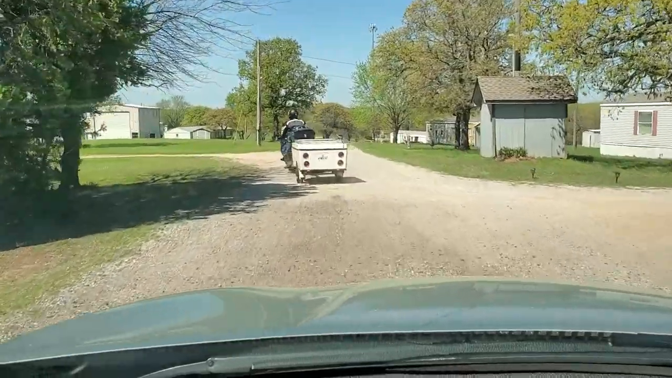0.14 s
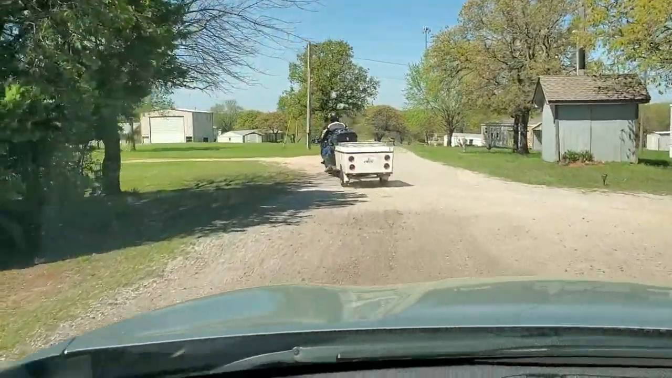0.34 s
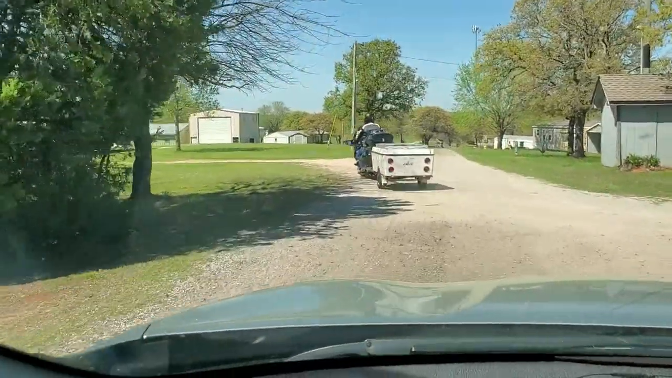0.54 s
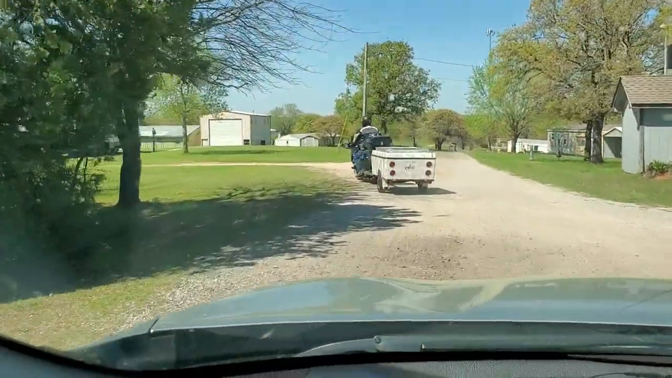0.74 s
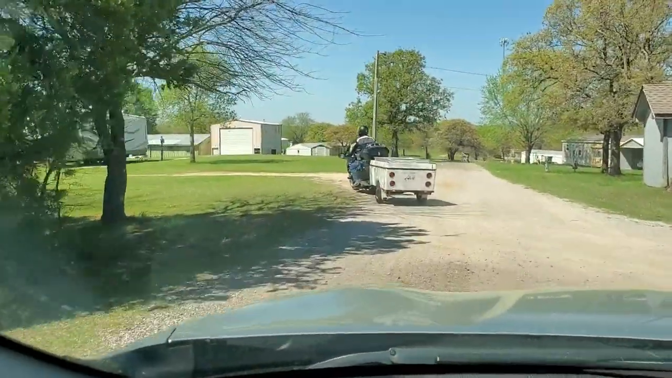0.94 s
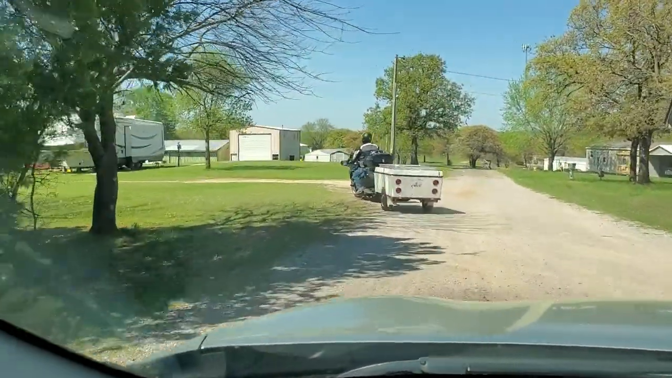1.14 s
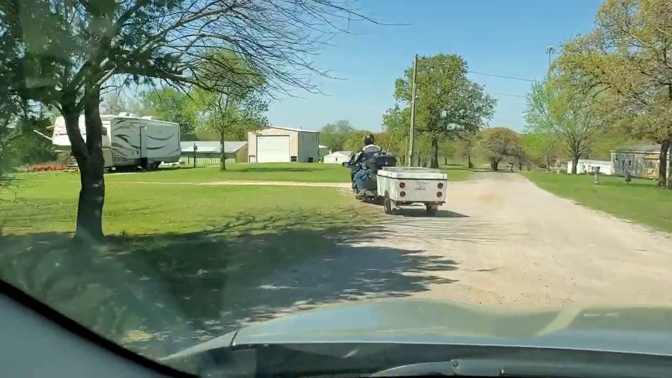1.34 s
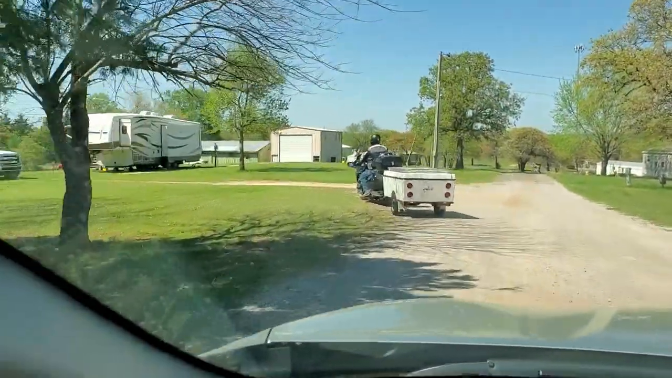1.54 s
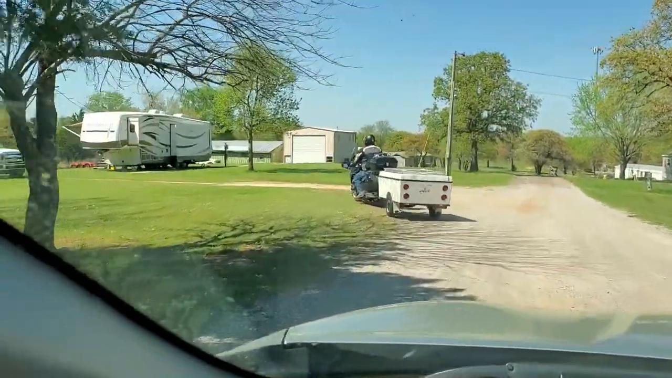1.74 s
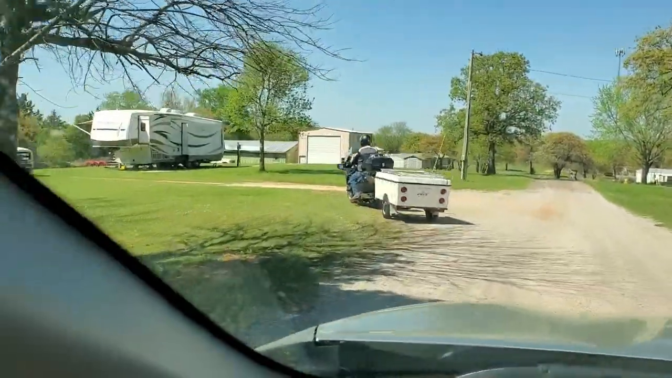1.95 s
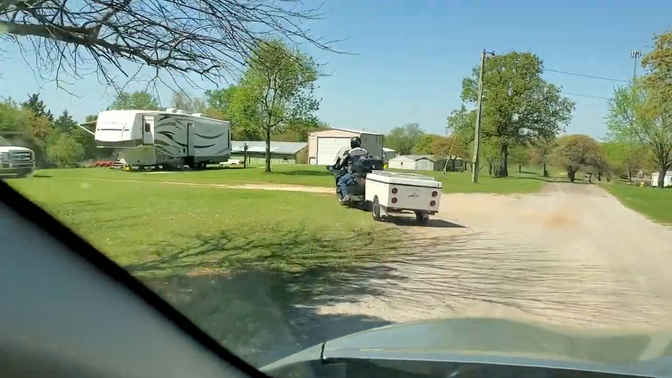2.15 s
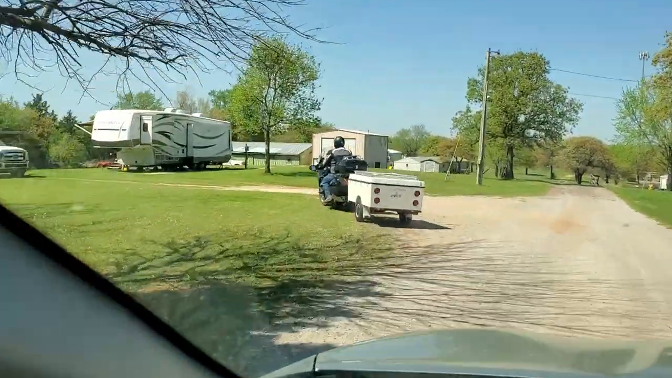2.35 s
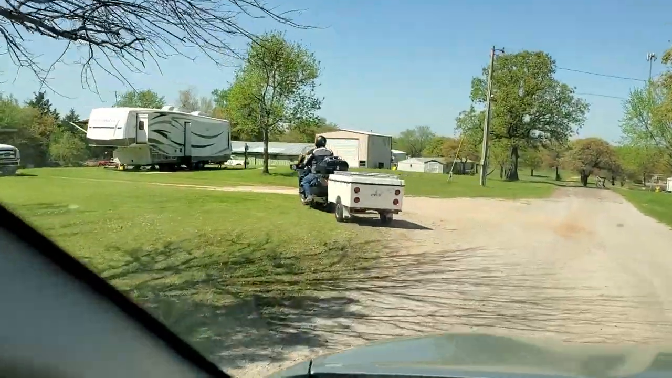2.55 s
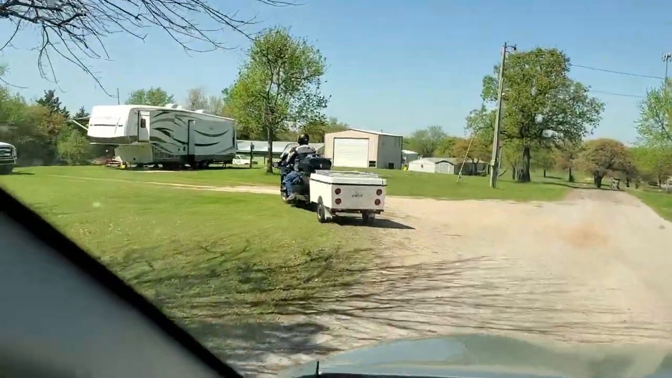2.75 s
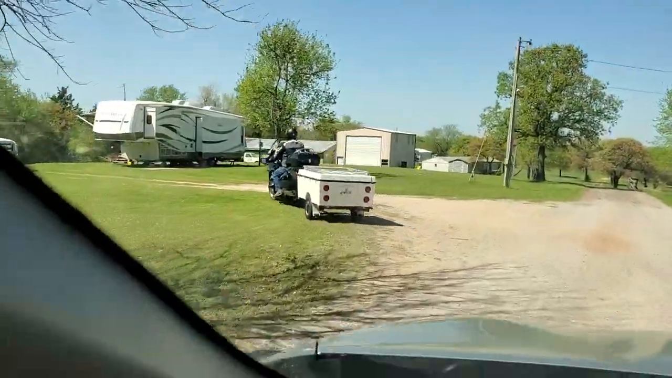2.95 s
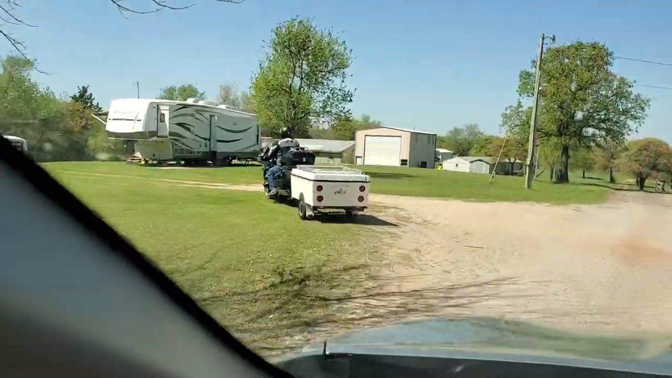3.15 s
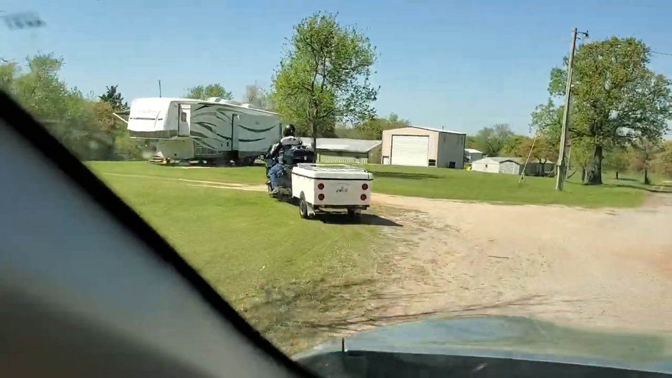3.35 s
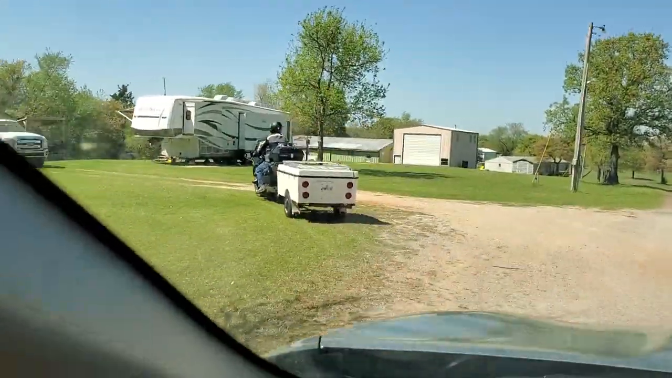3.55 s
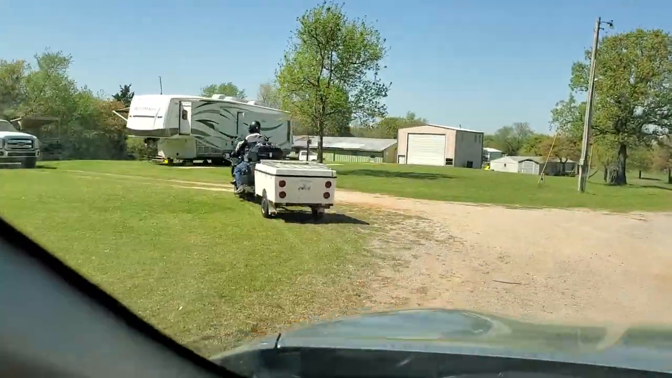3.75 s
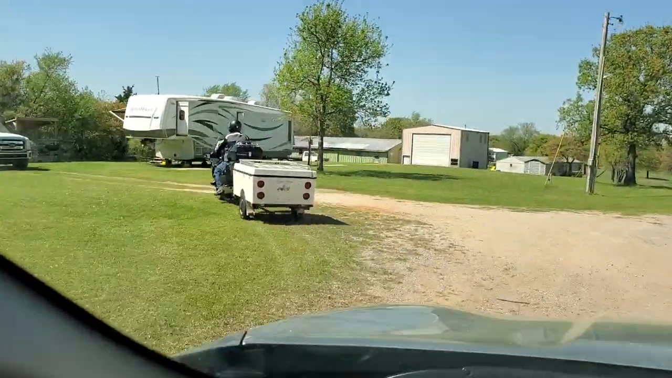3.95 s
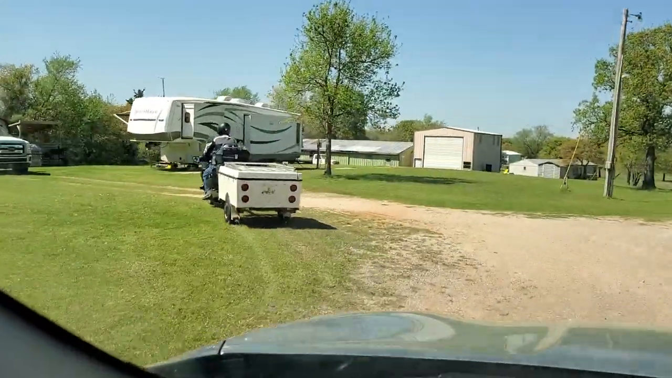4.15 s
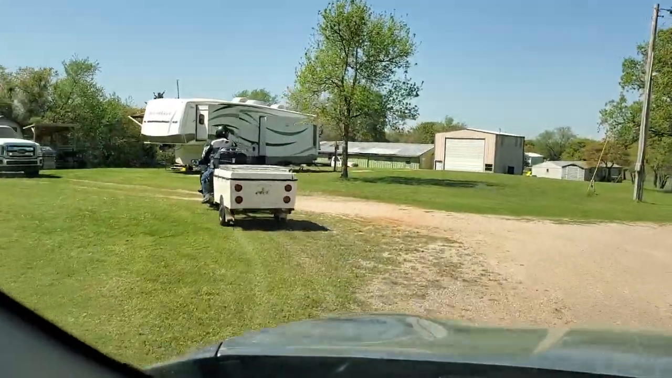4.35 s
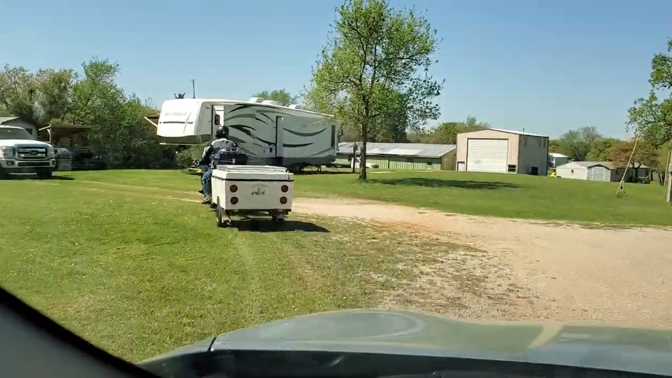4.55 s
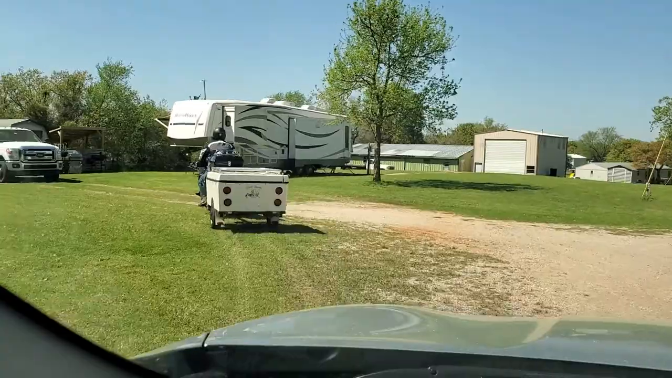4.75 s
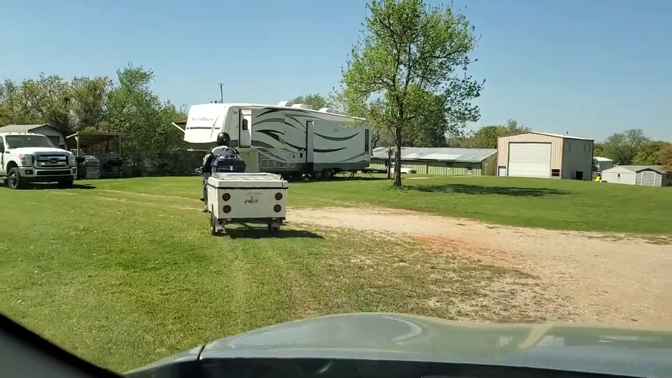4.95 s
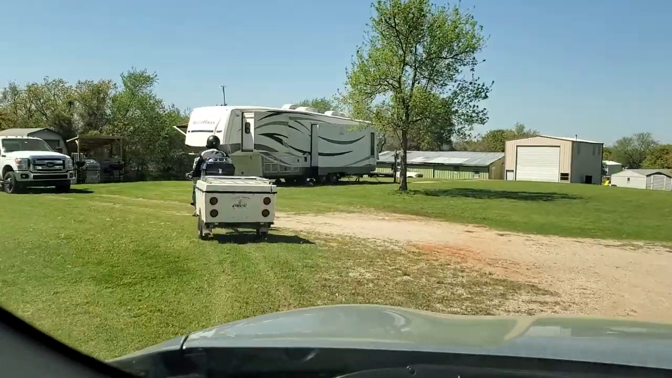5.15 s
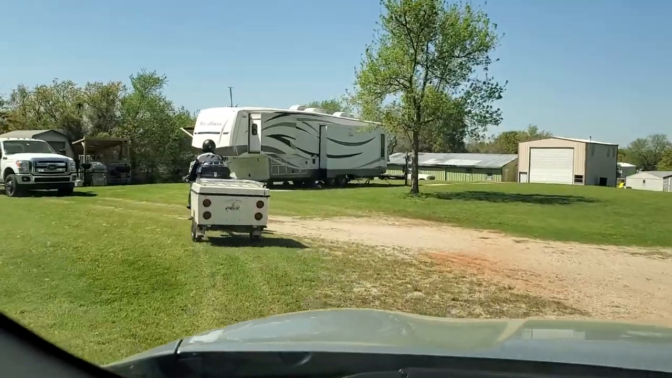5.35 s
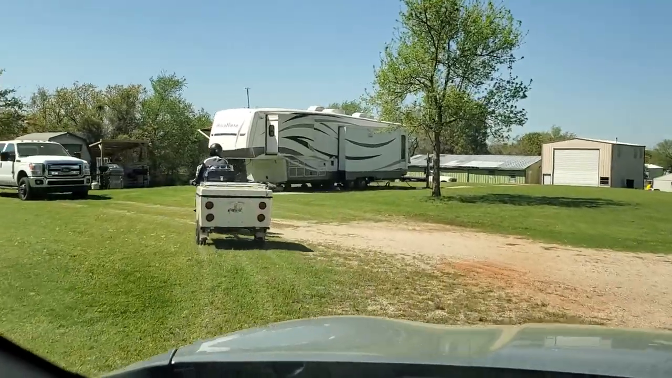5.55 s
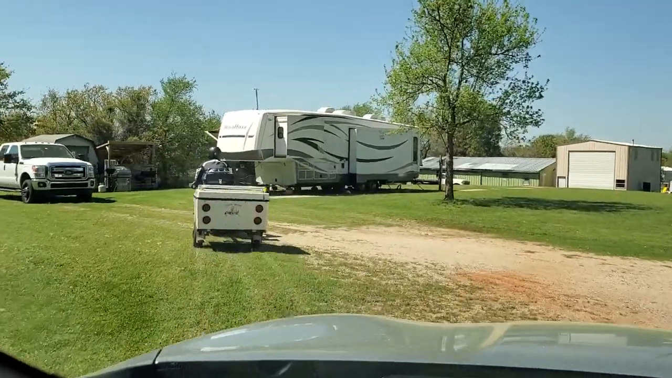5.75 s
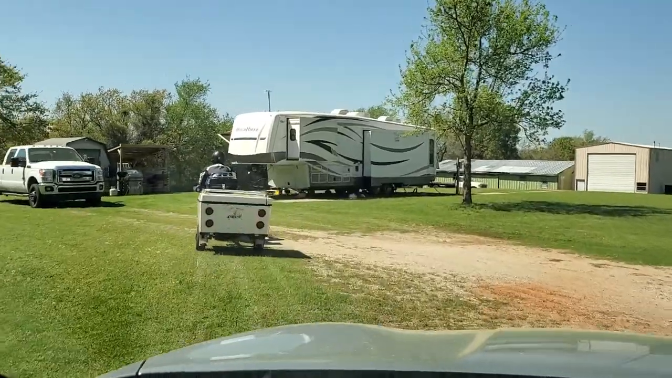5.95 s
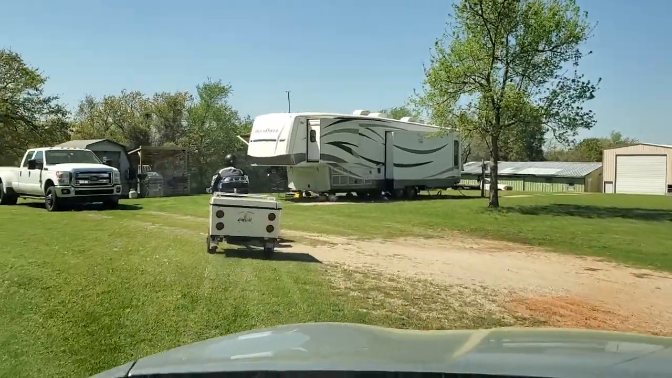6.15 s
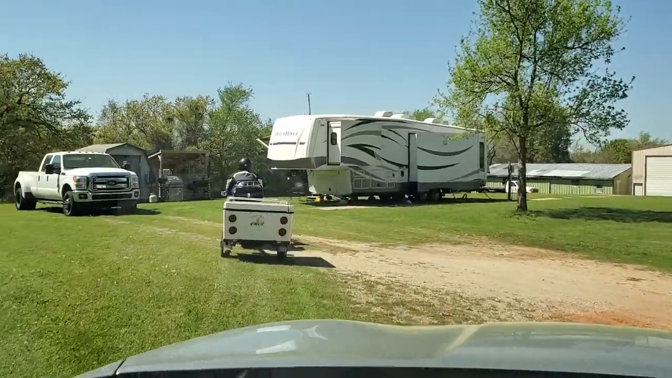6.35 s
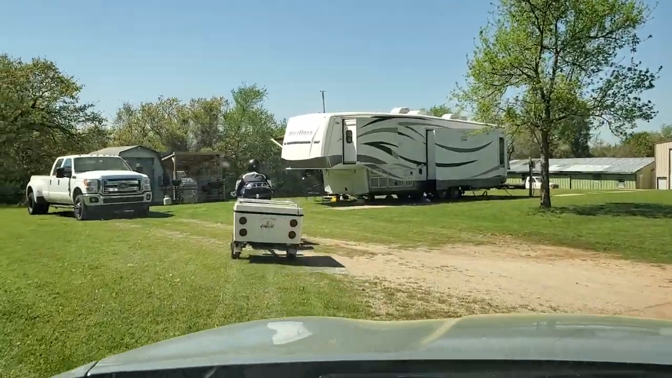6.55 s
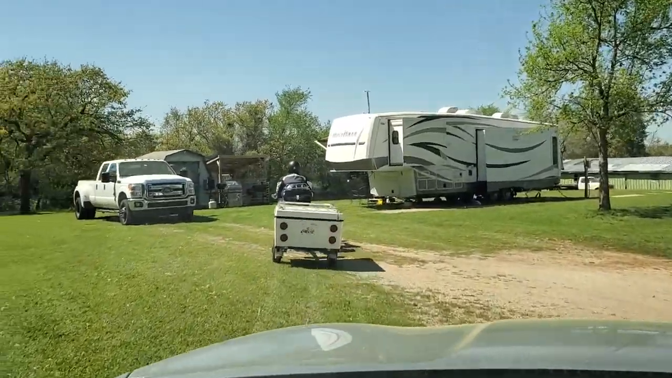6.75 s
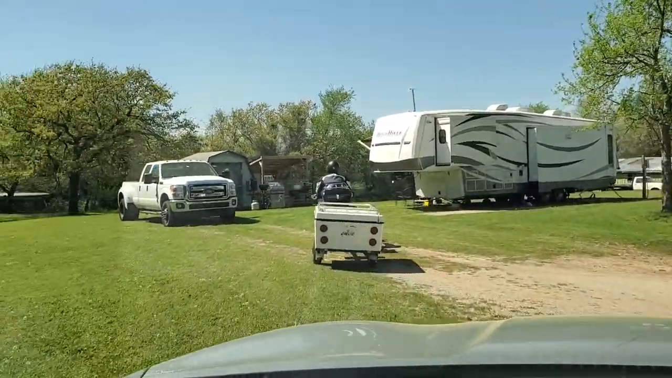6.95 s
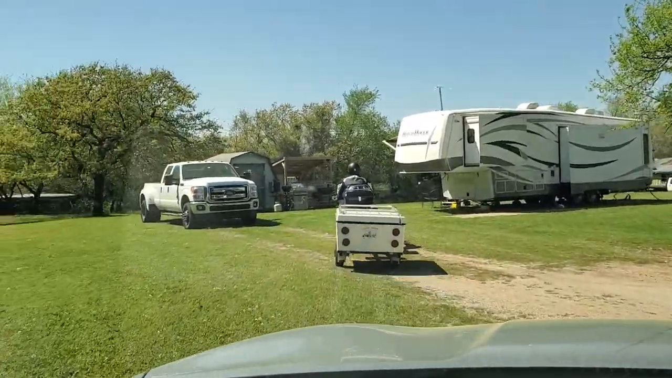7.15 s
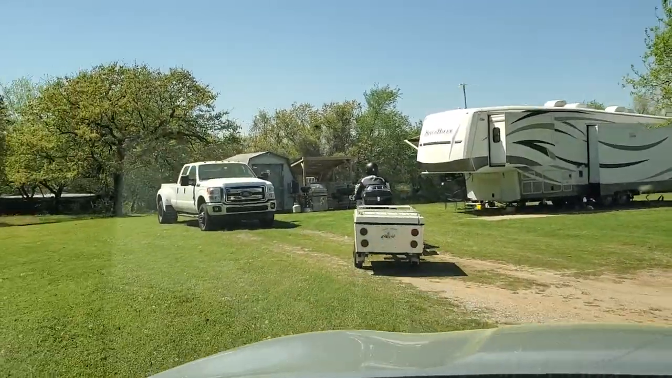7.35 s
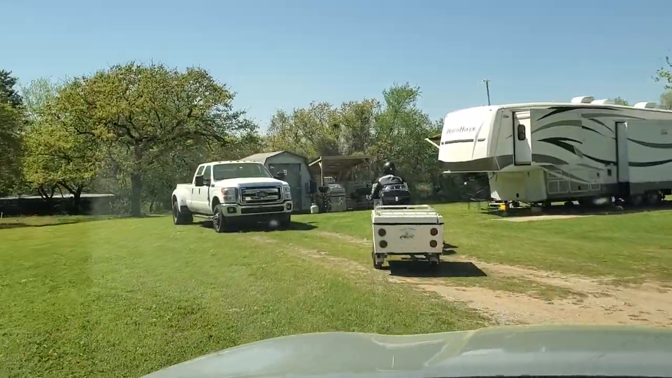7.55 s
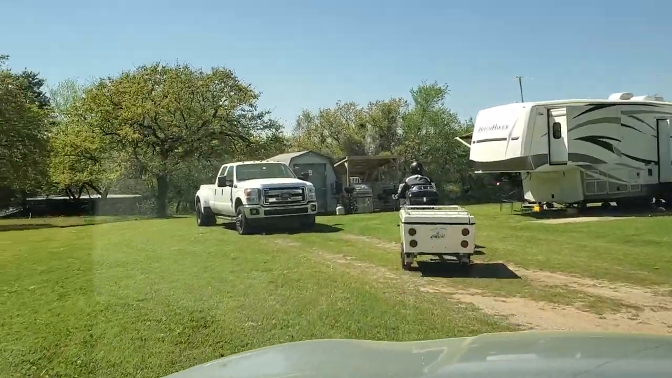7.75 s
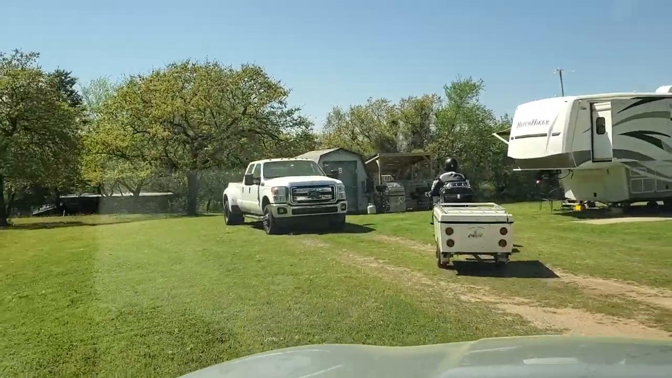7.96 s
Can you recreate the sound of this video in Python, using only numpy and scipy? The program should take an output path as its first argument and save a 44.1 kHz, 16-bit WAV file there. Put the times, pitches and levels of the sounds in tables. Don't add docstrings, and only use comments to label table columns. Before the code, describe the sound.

Heard from a hand-held phone inside a slowly moving car: deep, irregular rumble and soft booming bumps from rough gravel, with a low engine hum and airy vent hiss. A tiny stone tick comes early. The rumble eases on grass, the hand knocks the phone just before six seconds, then the vents blow stronger and the engine rises slightly. The left side is duller and quieter.

```python
import sys
import numpy as np
from scipy import signal
from scipy.fft import rfft, irfft, next_fast_len
from scipy.io import wavfile
from scipy.ndimage import uniform_filter1d, map_coordinates

SR = 44100
rng = np.random.default_rng(int(sys.argv[2]) if len(sys.argv) > 2 else 0)


def volts_from_db(level):
    exponent = np.asarray(level, float) / 20
    return 10 ** exponent


def to_wav(sig):
    pcm = np.clip(np.atleast_2d(sig), -1, 1) * 32767
    pcm = np.round(pcm).astype(np.int16)
    wavfile.write(sys.argv[1], SR, pcm.T)


N = 356769


def unit(x):
    return x / np.sqrt(np.mean(x ** 2) + 1e-20)


def along(points, hz):
    f, v = np.transpose(points)
    return np.interp(np.log(hz + 1), np.log(f + 1), v)


def curves(rows):
    s, *cols = np.transpose(rows)
    return [np.interp(np.arange(N) / SR, s, c) for c in cols]


def wobble(rate):
    knots = rng.standard_normal(int(N * rate / SR) + 4)
    return map_coordinates(knots, [np.arange(N) * rate / SR])


def filtered(x, response):
    edge = SR // 8
    m = next_fast_len(N + 2 * edge)
    x = np.pad(x, [(0, 0)] * (x.ndim - 1) + [(edge, m - N - edge)], mode="reflect")
    return irfft(rfft(x) * response(np.fft.rfftfreq(m, 1 / SR)), m)[..., edge:edge + N]


def resonance(f, hz, width):
    return (f * width) ** 2 / ((hz * hz - f * f) ** 2 + (f * width) ** 2)


def shaken(modes, steady, span):
    def ring(f):
        return sum(volts_from_db(db) * resonance(f, hz, width) for hz, width, db in modes)

    x = filtered(rng.standard_normal((2, N)), ring)
    swell = np.abs(uniform_filter1d(x ** 2, round(span * SR), axis=1, mode="reflect"))
    return unit(x / (swell + 1e-12) ** (np.clip(steady, 0, 1) / 2))


def jolts(rows, half_s, db):
    t = np.arange(N) / SR
    phase = 2 * np.pi * rng.random(len(rows))
    out = np.zeros(N)
    for (s, peak_db, hz), start in zip(rows, phase):
        near = slice(max(round((s - .3) * SR), 0), round((s + .3) * SR))
        swell = np.exp(-.5 * ((t[near] - s) / half_s) ** 2)
        out[near] += volts_from_db(peak_db + db) * swell * np.sin(2 * np.pi * hz * t[near] + start)
    return out


# time in seconds, roughness in dB.
ROUGHNESS = [(0, 0.5), (.5, 1.5), (1.5, 0.5), (2.3, -1), (2.8, -1.5), (3.7, -3), (4.55, -1), (5.4, -5),
             (6.0, -6.5), (6.36, -11), (6.45, -4.5), (7.2, -9.5), (7.95, -6.5), (8.09, -1)]
# centre in Hz, width in Hz, level in dB.
CABIN_MODES = [(31.5, 7, -4), (43.7, 17, 4.5)]
# centre in Hz, width in Hz, level in dB.
PAN_MODES = [(63.2, 9.7, -7), (73.3, 12, -2.5), (78.8, 8, -6)]
# centre in Hz, width in Hz, level in dB.
AXLE_MODES = [(90.9, 9.1, -3.5), (98.3, 16, 3), (110.2, 8.8, -8), (124.6, 9.2, -10.5), (163, 15, -19)]
# peak time in seconds, peak level in dB, pitch in Hz.
HOLLOWS = [(0.5, -17.5, 47), (0.65, -19, 39), (1.26, -13, 44), (1.58, -13.5, 46), (1.98, -13, 44),
           (2.28, -16, 47), (2.39, -12.5, 42), (2.72, -17.5, 44), (3.39, -24, 47), (3.71, -20, 43),
           (3.92, -16.5, 40), (4.45, -24, 43), (4.6, -20.5, 44), (5.08, -20.5, 43), (6.93, -16.5, 41.1),
           (7.3, -17, 46), (7.53, -18, 46), (7.65, -17.5, 47), (7.9, -22, 46), (8.07, -18, 52)]
# peak time in seconds, peak level in dB, pitch in Hz.
RUTS = [(0.48, -16.5, 77), (0.51, -16, 103), (0.95, -15, 70), (1.15, -18, 67), (1.53, -17.5, 75.8),
        (1.67, -15.5, 94.3), (1.91, -16.5, 60.8), (1.99, -19.5, 94), (2.22, -21, 102.2),
        (2.34, -20.5, 98.3), (2.55, -19, 91.9), (3.02, -19.5, 67), (3.04, -16.5, 88.7), (3.46, -19, 89),
        (3.95, -20.5, 68.8), (4.12, -21.5, 96.1), (4.38, -22.5, 78), (4.5, -19, 90.1), (4.51, -20.5, 70),
        (4.63, -20, 70), (5.15, -20.5, 90.2), (5.29, -22, 70.5), (5.68, -17.5, 71.5), (5.9, -25, 75),
        (6.05, -22, 85.5), (6.17, -23.5, 93), (6.55, -23.5, 71.8), (6.68, -24, 77.95), (7.37, -24, 64),
        (7.7, -25.5, 68)]


def road():
    rough_db, = curves(ROUGHNESS)
    steady_db = -23.5
    boom = volts_from_db(steady_db + 0.42 * rough_db) * shaken(CABIN_MODES, steady=0.55, span=0.16)
    pan = volts_from_db(steady_db + 0.82 * rough_db) * shaken(PAN_MODES, steady=0.5, span=0.27)
    axle = volts_from_db(steady_db + 0.99 * rough_db) * shaken(AXLE_MODES, steady=0.4, span=0.041)
    single = jolts(HOLLOWS, half_s=0.075, db=0.0) + jolts(RUTS, half_s=0.046, db=0.5)
    return boom + pan + axle + single * [[1], [0]]


# time in seconds, firing rate in Hz.
FIRING = [(0, 41.4), (1.2, 42.7), (1.94, 42), (2.2, 45.6), (2.55, 42.5), (3.5, 45.4), (4.0, 40.96),
          (4.5, 43), (6.0, 38.6), (6.9, 40.15), (7.35, 45.02), (8.09, 49.5)]


def engine():
    hz, = curves(FIRING)
    idle_hz, idle_db, db_per_hz = 41, -34, .6
    turn = 2 * np.pi * np.cumsum(hz * (1 + .015 * wobble(3.2))) / SR
    level_db = idle_db + db_per_hz * (hz - idle_hz) + 2.4 * wobble(5)
    return volts_from_db(level_db) * (np.sin(turn) + volts_from_db(-9.5) * np.sin(2 * turn) + volts_from_db(-14.5) * np.sin(3 * turn))


# start in seconds, level in dB.
STONE_HITS = [
    (1.510, -55),
    (1.524, -56),
    (1.5355, -41.5),
    (1.551, -53),
]
# centre in Hz, width in Hz, level in dB, t60 in seconds.
STONE_BANDS = [(11500, 10000, 1, .03)]
# start in seconds, level in dB.
HAND_HITS = [
    (5.8375, -33),
    (5.845, -39),
    (5.862, -42),
]
# centre in Hz, width in Hz, level in dB, t60 in seconds.
FINGER_BANDS = [(2850, 400, -4, .06), (3500, 250, -4, .08), (6500, 2400, -15, .07), (900, 900, -1, .08)]
# pitch in Hz, level in dB, t60 in seconds.
SHELL_MODES = [(118, 2, .14), (160, 0, .12), (205, -3, .1), (300, -8, .08), (430, -7, .1), (520, -6, .1)]


def knocks():
    out = np.zeros((2, N + SR))
    t = np.arange(SR // 5) / SR
    f = np.fft.rfftfreq(len(t), 1 / SR)

    def burst(hz, width):
        noise = rng.standard_normal((2, len(t)))
        return unit(irfft(rfft(noise) * resonance(f, hz, width), len(t)))

    thud_db = 13
    thud = sum(volts_from_db(thud_db + db - 60 * t / t60) * np.sin(2 * np.pi * hz * t) for hz, db, t60 in SHELL_MODES)
    onset = 1 - np.exp(-t / 0.0014)
    for hits, bands, ring in [(STONE_HITS, STONE_BANDS, 0), (HAND_HITS, FINGER_BANDS, thud)]:
        for s, db in hits:
            click = sum(burst(hz, width) * volts_from_db(level - 60 * t / t60) for hz, width, level, t60 in bands)
            out[:, round(s * SR):][:, :len(t)] += volts_from_db(db) * (click + ring) * onset
    return out[:, :N]


def patches(x, depth_db):
    z = signal.stft(x, nperseg=512)[2]
    field = uniform_filter1d(rng.standard_normal(z.shape[1:]), size=8, axis=0)
    field = uniform_filter1d(field, size=30, axis=1)
    return signal.istft(z * volts_from_db(depth_db * unit(field)), nperseg=512)[1][:, :N]


# time in seconds, level in dB.
VENT_LEVEL = [(0, -41.5), (1.6, -42), (3.0, -41.5), (4.3, -40.5), (5.6, -40.5), (6.7, -38), (7.07, -38),
              (8.09, -38)]
# time in seconds, pose from 0 to 3.
HAND_POSE = [(0, 0), (1.8, 0), (2.1, 1), (3.5, 1), (3.75, 2), (5.8, 2), (6.3, 3), (8.09, 3)]
POSE_HISS_DB = [-22, -23, -21.5, -22.5]
# frequency in Hz, level in dB per Hz.
AIR_COLOUR = [(90, -30), (140, 0.5), (220, -3), (400, -11.5), (700, -14), (1200, -18.5), (2300, -24),
              (4000, -30), (5000, -35), (7500, -37), (10000, -41.5), (10700, -44), (13000, -59),
              (14400, -74)]
# centre in Hz, width in Hz, then lift in dB in each of the four poses.
DUCT_MODES = [(333.7, 24, 4, 5.5, 5, 4.5), (491, 102, 8, 8, 8.5, 8), (924, 132, 10, 9.5, 10.5, 7.5),
              (1264, 120, -1, -3, -1.5, -1.5), (1462, 207, 5, 4, 7, 2.5), (1616, 140, -0.5, 5.5, -3.5, 1.5),
              (1811, 64, 7, -1.5, 7, 3.5), (1971, 153, 5.5, 6, 8, 7), (676, 230, 1, 0.5, -1, 0),
              (2585, 300, -2.5, -3, -2, -2.5), (4270, 460, 2.5, 5.5, 2, 0.5), (3370, 730, 4.5, 1.5, 4.5, 4),
              (12050, 1060, 13, 11.5, 12, 13)]


def blower():
    level_db, = curves(VENT_LEVEL)
    pose, = curves(HAND_POSE)
    hiss_db = level_db + np.interp(pose, range(len(POSE_HISS_DB)), POSE_HISS_DB)
    hz, width, *lifts = np.transpose(DUCT_MODES)
    air = patches(rng.standard_normal((2, N)), depth_db=0.86)
    out = 0
    for k, lift_db in enumerate(lifts):
        def duct(f):
            peaks_db = sum(g / (1 + (2 * (f - c) / w) ** 2) for c, w, g in zip(hz, width, lift_db))
            return volts_from_db(along(AIR_COLOUR, f) + peaks_db) * (f > 60)

        share = np.clip(1 - np.abs(pose - k), 0, 1)
        out = out + share * filtered(air, duct)
    top = filtered(out, lambda f: f ** 4 / (f ** 4 + 4610.0 ** 4))
    rush = volts_from_db(level_db + 7) * unit(out - top)
    hiss = volts_from_db(hiss_db + 6.5) * unit(top)
    return volts_from_db(0.21 * wobble(6.4)) * (rush + hiss)


# frequency in Hz, level in dB.
COVER_DB = [(40, -8), (200, -7.7), (450, -9), (700, -7), (950, -14), (1300, -9), (1900, -13), (4000, -14),
            (6300, -17), (7000, -22), (7400, -29), (7900, -12), (9700, -14), (10400, -20)]
# frequency in Hz, likeness from 0 to 1.
LIKENESS = [(100, .985), (300, .9), (400, .72), (520, .9), (690, .3), (900, .65), (1500, .6), (2300, .3),
            (4000, .35), (5000, .05)]
# frequency in Hz, lag in radians.
COVER_LAG = [(100, 0), (300, .5), (480, .4), (650, 1), (780, 2.9), (1300, 3.3), (2000, 3.2), (4000, 8.5),
             (8000, 22)]


def covered_port(near, other):
    def alike(f):
        return np.clip(along(LIKENESS, f), 0, 1)

    shared = filtered(near, lambda f: alike(f) * np.exp(-1j * along(COVER_LAG, f)))
    apart = filtered(other, lambda f: np.sqrt(1 - alike(f) ** 2))
    return filtered(shared + apart, lambda f: volts_from_db(along(COVER_DB, f)))


def scene():
    near, other = road() + blower() + knocks() + engine() * [[1], [0]]
    return np.array([covered_port(near, other), near])


# frequency in Hz, left signal over step in dB, right signal
# over step in dB.
ROUNDING_DETAIL = [(200, 34, 40), (700, 18, 26), (2000, 10, 20), (3500, 7, 17), (4400, 3, 14), (5000, -3, 12),
                   (6500, -6, 11), (7200, -10, 9), (7900, -4, 2), (9600, -6, -1), (10700, -13, -7),
                   (11800, -14, -3), (12600, -12, -7), (13300, -9, -14)]


def coarse_steps(x, start, spare_db, size=1024, count=672):
    n = np.arange(2 * size)
    window = np.sin(np.pi * (n + .5) / (2 * size))
    basis = window * np.cos(np.pi / size * (n + .5 + size / 2) * (np.arange(count)[:, None] + .5))
    x = np.pad(x, ((0, 0), (size - start, 2 * size)), mode="reflect")
    c = np.lib.stride_tricks.sliding_window_view(x, 2 * size, axis=1)[:, ::size].copy() @ basis.T
    frames = c.shape[1]
    hz = (np.arange(count) + .5) * SR / (2 * size)
    power = uniform_filter1d(uniform_filter1d(c ** 2, size=64, axis=1), size=24, axis=2)
    rms = np.sqrt(np.abs(power) + 1e-18)
    over_db = spare_db + np.array([along(np.array(ROUNDING_DETAIL)[:, [0, k]], hz) for k in (1, 2)])
    wander_db = 1.5 * rng.standard_normal((2, frames, 1))
    wander_db = wander_db + 4 * rng.standard_normal((2, frames, count // 16)).repeat(16, axis=2)
    wander_db = uniform_filter1d(wander_db, size=2, axis=1) * [[[.6]], [[1.3]]]
    step = rms / volts_from_db(over_db)[:, None] * volts_from_db(wander_db)
    coarse = np.sign(c) * np.floor(np.abs(c) / step + .4054) * step
    parts = coarse @ basis * 2 / size
    first = np.pad(parts[..., :size], ((0, 0), (0, 1), (0, 0)))
    second = np.pad(parts[..., size:], ((0, 0), (1, 0), (0, 0)))
    return (first + second).reshape(2, -1)[:, size - start:][:, :N]


def top_cut(x):
    return signal.sosfilt(signal.butter(12, 14490, fs=SR, output="sos"), x)


def record(dry):
    x = filtered(dry, lambda f: f ** 2 / (f ** 2 + 20 ** 2))
    x = coarse_steps(x, start=700, spare_db=np.array([[-2], [-4]]))
    x = coarse_steps(x, start=118, spare_db=np.array([[5], [5]]))
    to_end = np.arange(N)[::-1] / (.004 * SR)
    mix = x * np.sin(np.pi / 2 * np.clip(to_end, 0, 1)) ** 2
    return top_cut(mix)


dry = scene()
out = record(dry)
to_wav(out)
```